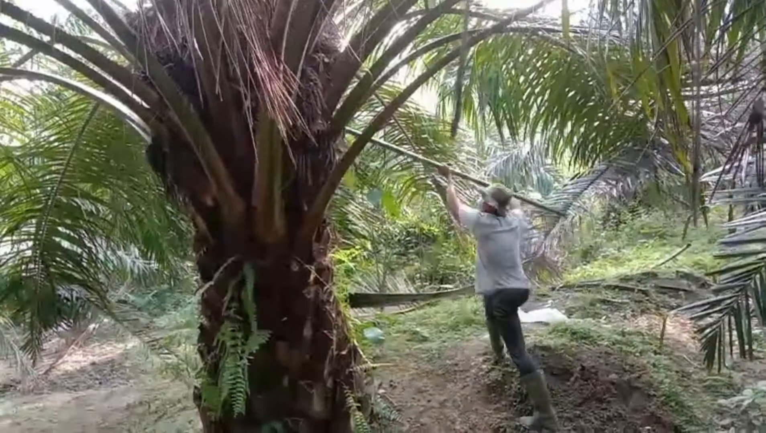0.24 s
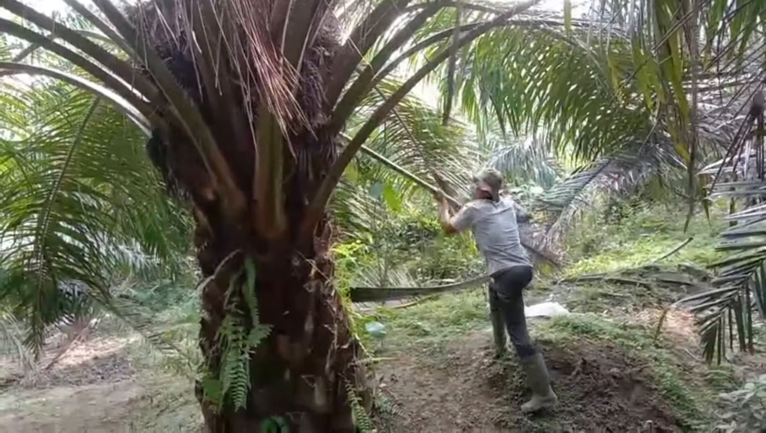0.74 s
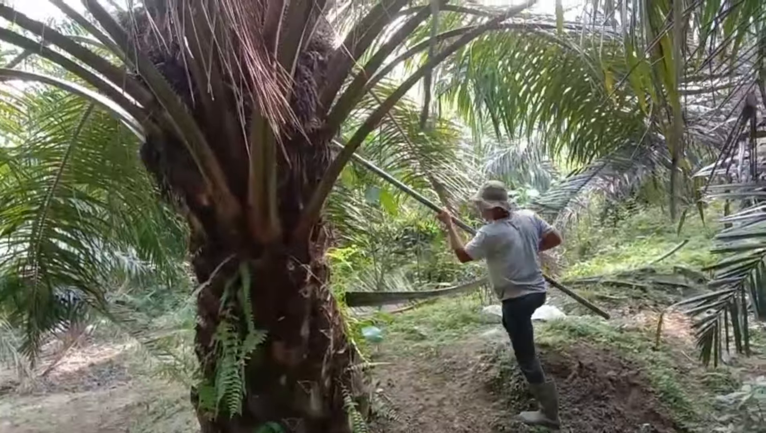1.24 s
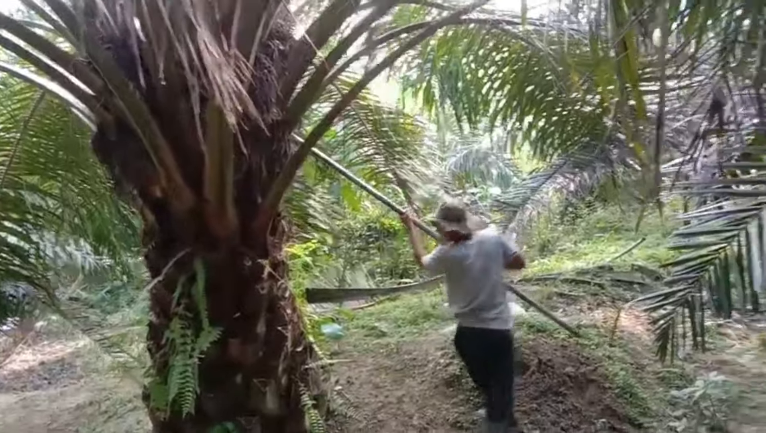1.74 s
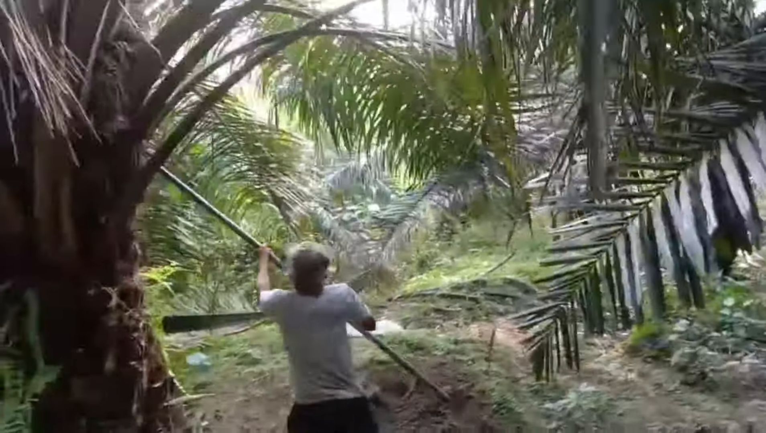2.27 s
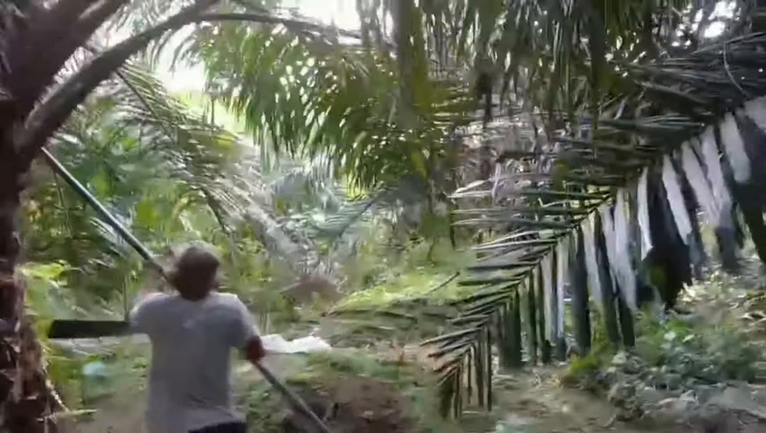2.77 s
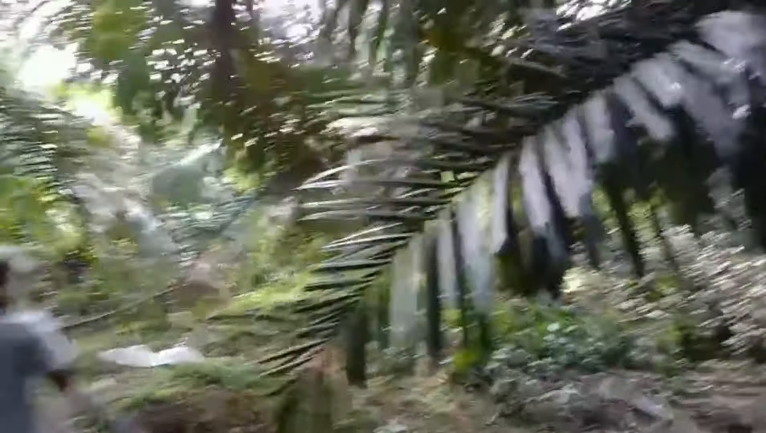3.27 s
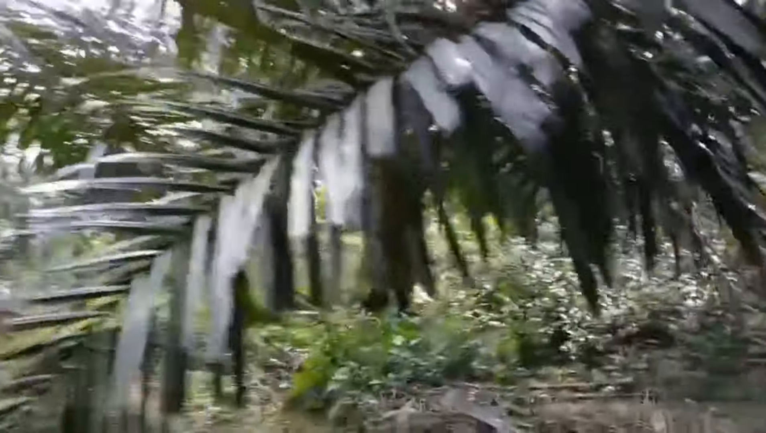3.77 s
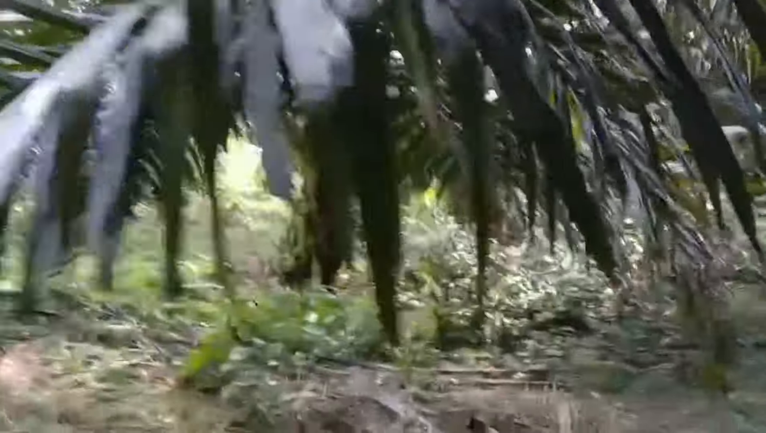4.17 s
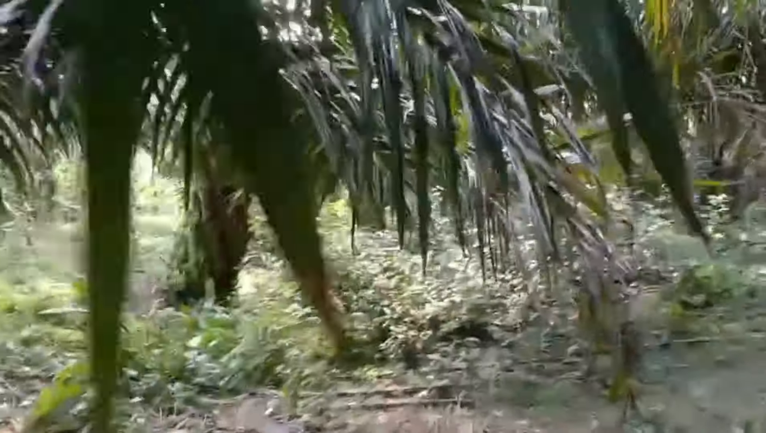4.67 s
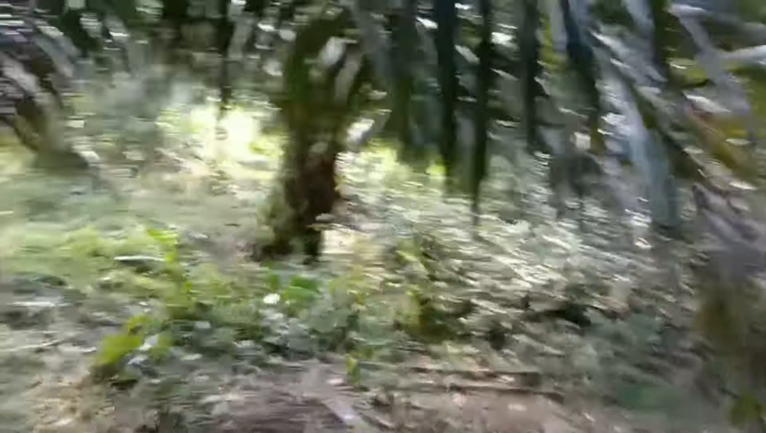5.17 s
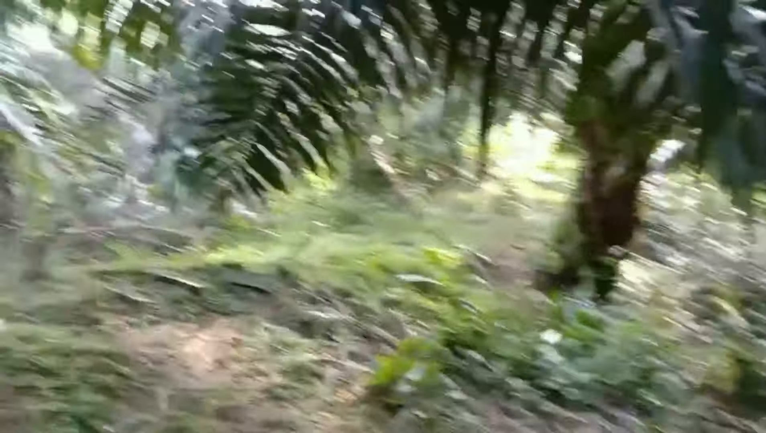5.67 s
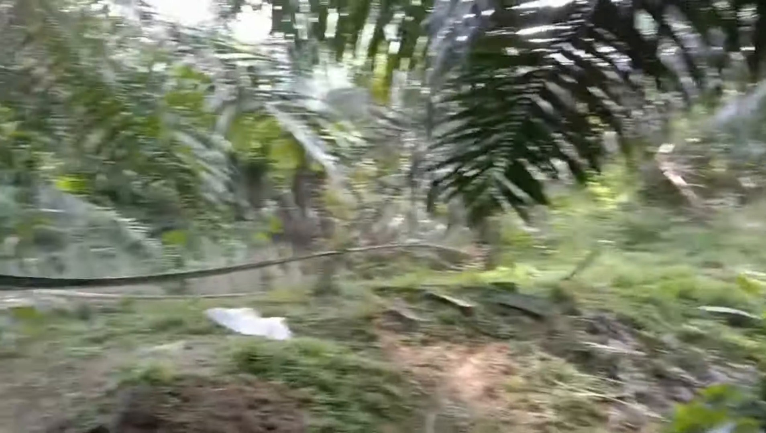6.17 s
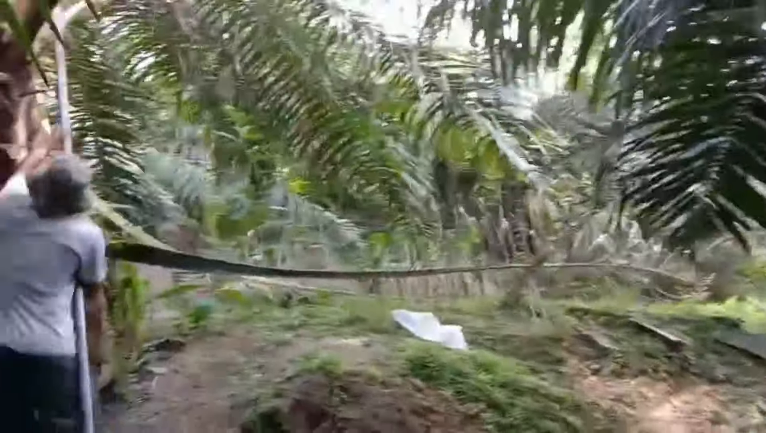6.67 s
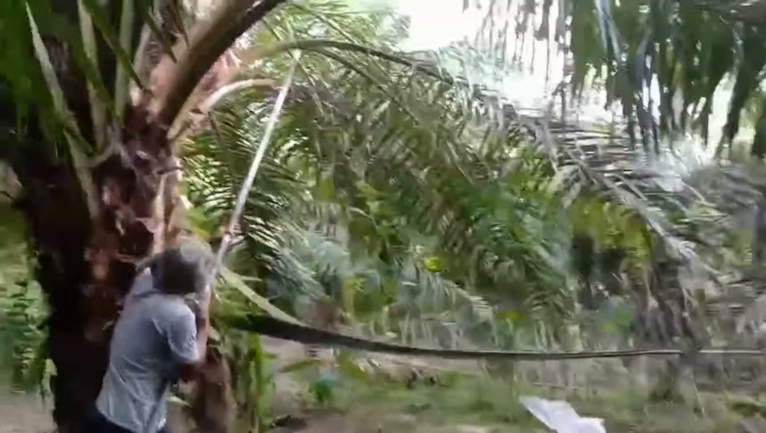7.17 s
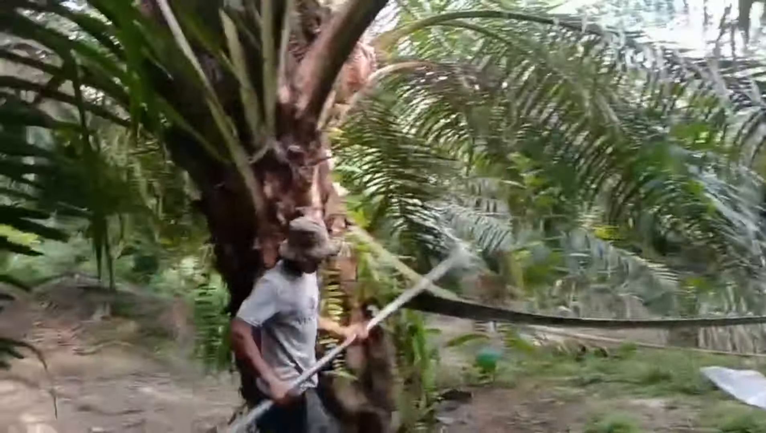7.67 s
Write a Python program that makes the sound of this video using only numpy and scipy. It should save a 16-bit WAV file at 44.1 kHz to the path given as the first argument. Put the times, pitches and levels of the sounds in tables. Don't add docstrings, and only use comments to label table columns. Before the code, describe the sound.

Outdoor plantation, phone microphone nearby: the pole sticks and slips softly on a stalk, then brittle fibres snap with showers of leaflet clicks. Steel briefly rings, stalks thud and dry leaves swish. Leaflets tick through a busy middle; later, hard pole clanks and dense crunching lead to a big rustling crash. Pauses are almost silent, with only short dull echoes.

```python
import sys
import numpy as np
from scipy import signal
from scipy.io import wavfile
from scipy.ndimage import uniform_filter1d

SR = 44100
rng = np.random.default_rng(int(sys.argv[2]) if len(sys.argv) > 2 else 0)


def store_pcm(level_fs):
    pcm = np.round(np.clip(level_fs, -1, 1) * 32767).astype(np.int16)
    wavfile.write(sys.argv[1], SR, np.atleast_2d(pcm).T)


def linear_from_db(decibels):
    return 10 ** (np.asarray(decibels, float) / 20)


N = 349713

# start in seconds, leaflet hiss in dB, fall in seconds, ribs in dB against the hiss.
JOLTS = [(0.308, -50.5, 0.06, 6), (.37, -63, 0.35, 18), (1.066, -39, 0.17, -4), (1.767, -44.5, 1, -6.5),
         (2.67, -32.5, 0.22, 4.5), (3.33, -39, 0.44, -4), (4.452, -33, 0.29, -3.5), (5.801, -25.5, 0.17, 0),
         (6.599, -39.5, 1, -1.5), (7.067, -27, 0.29, -8), (7.127, -21, 0.082, 3),
         (7.295, -33.5, 0.36, -3.5), (7.827, -21.5, 1, -20)]
JOLT_RISE_S = 0.022
# time of the top in seconds, leaflet hiss in dB, rise in seconds,
# fall in seconds, ribs in dB against the hiss.
SWAYS = [(.07, -48, 0.42, 0.14, 11), (.2, -57.5, 0.43, 0.31, -10), (.43, -50.5, 0.11, 0.45, 19),
         (.52, -41, .06, 0.09, 0), (.64, -37, 0.39, 0.14, 2.5), (.76, -47.5, 0.13, 0.1, -19),
         (1.22, -66, .05, .08, 6), (1.58, -75, .04, .2, 12), (2.1, -30.5, 0.092, 0.15, -9),
         (2.56, -30.5, 0.052, 0.13, -37.5), (2.72, -40, 0.44, 0.38, -5), (3.27, -62.5, 2, .2, -26),
         (3.5, -40, 0.26, 0.095, -4), (3.69, -39.5, 0.11, 0.43, -6), (3.86, -40, 0.059, 0.11, 15),
         (3.99, -34, 0.44, 0.28, -3.5), (4.04, -25, .04, 0.071, 0), (4.097, -21, 0.061, 0.087, -4),
         (4.35, -41.5, 0.5, 0.51, -3), (4.84, -40.5, 0.27, 0.38, -3), (5.25, -42, 1, 0.38, -10),
         (5.43, -39, 0.63, 0.14, -1.5), (5.51, -34, .05, 0.13, -2), (5.57, -38.5, 0.2, 0.078, -6),
         (5.72, -55, 0.61, 0.5, -9), (6.16, -44, 0.54, 0.063, -10), (6.42, -63, 0.51, 0.085, 3.5),
         (6.75, -36.5, 0.18, 0.046, -5), (6.845, -33.5, 0.29, 0.2, -6.5), (7.333, -24, .04, .05, -10),
         (7.55, -47.5, 0.65, 0.98, -24), (7.9, -17, 0.12, .5, -10)]
# time of the top in seconds, rumble in dB, rise and fall in seconds.
LOADS = [(.0, -35.5, .1, 0.1), (.42, -63, 0.037, 0.21), (.64, -42, 0.16, 0.11), (.75, -49.5, 0.038, 0.054),
         (1.06, -50, 0.03, 0.043), (1.21, -62, .05, .06), (1.77, -58.5, 0.084, 0.21),
         (2.1, -56, 0.14, 0.079), (2.56, -57.5, 0.21, 0.28), (2.67, -25, 0.026, 0.018),
         (2.72, -50.5, 0.061, 0.12), (3.51, -38.5, 0.038, 0.011), (3.6, -43, 0.005, 0.059),
         (3.86, -48.5, 0.036, 0.29), (4.04, -36.5, 0.17, 0.1), (4.46, -54, 0.18, 0.16),
         (4.84, -65.5, 0.26, 0.13), (5.32, -70.5, 0.52, 0.088), (6.16, -63.5, 0.66, 0.053),
         (6.82, -42, 0.26, 0.077), (7.07, -52, 0.057, 0.14), (7.13, -35.5, 0.21, 0.12),
         (7.4, -60.5, 0.31, 0.31), (7.82, -35.5, 0.0091, 0.17)]
SWELL_DB = 30
SETTLE = 1.285
# time in seconds, dry edge in dB against the hiss.
DRYNESS = [(0, -21), (.45, -19.5), (.65, -7), (1.1, -19.5), (2.1, -21), (2.3, -9), (3.4, -13), (4.5, -16),
           (5.42, -13), (5.55, -26), (5.75, -34), (5.82, -16), (6.2, -6.5), (6.8, -14), (7.4, -5),
           (7.93, -7)]
# stalk, ribs, leaflets and edges, in dB.
RESTING_DB = (-100, -78, -75, -79.5)
# start in seconds, peak in dB, ribs in dB, shower of clicks in dB.
SNAPS = [(2.079, -11, -4, -17.5), (2.294, -25.5, -12.5, -14.5), (2.415, -21, -20, -11),
         (2.48, -15, -7, -16.5), (2.542, -11, -7, -17.5), (3.302, -13, -0.5, -19),
         (3.513, -23.5, -9.5, -15.5), (3.601, -11, -3, -17.5), (3.738, -23.5, -19, -13),
         (4.681, -23.5, -15, -15), (5.026, -34.5, -11.5, -4), (5.173, -12, -2, -33), (5.4, -18, -26, -28),
         (5.427, -16, -2.5, -18), (5.796, -21, 11.5, -15), (6.119, -29.5, -11, -7),
         (6.135, -6.5, -14.5, -19.5), (6.411, -29, -30, -13.5), (6.446, -33, -43, -13.5),
         (7.062, -25, 13.5, -17.5), (7.125, -9, -17, -13), (7.286, -11, -9, -18), (7.325, -20, -12, -15),
         (7.619, -34.5, -7, -16), (7.814, -8, 6, -13.5)]
# start in seconds, peak in dB, ribs in dB, shower of clicks in dB.
CRACKS = [(1.05, -24, -1.5, -16.5), (1.645, -51.5, -3, -12), (1.721, -43.5, -25, 4.5), (2.663, -2, -7, -22),
          (2.839, -22.5, -6, -12), (3.405, -22, -2, -17), (3.807, -36, 26.5, -20), (3.829, -27.5, 9.5, -9),
          (3.871, -32, 27, -31), (3.904, -28, 15, -19), (4.028, -22, -8, -12), (4.771, -46, 19, -13),
          (4.817, -34, 14.5, -20), (5.305, -13.5, -35, -35), (5.445, -13, -4.5, -24),
          (5.49, -20.5, -16, -17), (6.005, -28, 0.5, -7.5), (6.022, -20, 1, -17.5),
          (6.165, -11.5, -6, -26.5), (6.32, -42, -1, -21), (6.379, -31, 4, -22), (6.582, -33, 8.5, -15),
          (7.417, -19.5, -19, -10), (7.811, -15, 2, -8)]
SNAP_EDGE_DB, CRACK_EDGE_DB = -14, -27
SHOWER_T60_S, SHOWER_LONGER = 0.15, 0.77
# pitch in Hz, level in dB per Hz.
FROND_COLOUR = [(59, -34), (100, -18.5), (287, -13.5), (402, -12), (695, -7.5), (1130, -11.5), (2410, -8),
                (2850, -3.5), (4170, -4.5), (5150, 6), (9480, -12.5), (15400, -19)]
# stalk, ribs, leaflets and edges, in Hz.
ZONES_HZ = (250, 1200, 4500, 11000)
# time in seconds, hollow tone in dB.
THICKNESS = [(0, -7.5), (.5, 1), (.9, -8), (1.5, -3), (1.6, 8), (1.75, -3), (2.4, -5), (3, -3), (3.5, -1.5),
             (3.9, -2.5), (4.4, 1), (5.2, -1), (5.6, -17), (5.9, -5), (6.3, -7.5), (6.8, 3), (7.3, -1),
             (7.93, -5.5)]
HOLLOW_HZ, HOLLOW_OCTAVES = 830, 0.47
# start in seconds, peak in dB, centre pitch in Hz.
TICKS = [(0.5125, -29, 1370), (0.61, -30, 5790), (0.6346, -28, 6010), (3.4278, -25.5, 1284),
         (3.4466, -29, 5200), (3.855, -20, 1230), (3.9855, -27, 5390), (4.012, -15, 2800),
         (4.0432, -19, 5050), (4.6836, -28.5, 5730), (4.6934, -31, 5050), (5.0434, -42, 5800),
         (5.1038, -32, 5000), (5.1174, -33, 6510), (5.1739, -17, 1740), (5.2255, -31, 6410),
         (5.4106, -20, 5110), (5.4292, -17.5, 5080), (5.445, -24, 4890), (5.531, -39, 5900),
         (5.5558, -29, 2850), (6.0644, -25, 6840), (6.0906, -30, 3330), (6.136, -7.5, 2870),
         (6.1689, -24, 1340), (6.486, -40, 5210), (6.7163, -23, 1200), (6.7416, -24, 2940),
         (6.7524, -22.5, 3140), (6.84, -24, 5120), (7.2816, -10, 5580), (7.2984, -20, 5810),
         (7.3314, -16, 5290), (7.461, -26, 5910), (7.4956, -28, 5360), (7.5546, -31, 5090),
         (7.7847, -36.5, 1650), (7.8792, -7, 1200), (7.897, -2, 6060)]
TICK_T60_S, TICK_OCTAVES, TICK_DB = 0.012, 0.66, -5

# level in dB, time to die by 60 dB in seconds.
BLADE_MODES = [(-18, 0.95), (2, .42), (-0.5, 0.17), (-3.5, 0.16), (-14, .17), (-15, .12)]
BLADE_HZ = (2830, 2852, 2884, 3144, 8113, 8204)
# start in seconds, main ring in dB, edge ring in dB, top ring in dB.
BLADE_HITS = [(2.08, -28, -40, -22), (2.255, -53, -57, -60), (2.295, -47, -50, -32), (2.481, -42, -42, -29),
              (2.542, -40, -33, -26), (2.582, -40, -42, -50), (2.663, -44, -36, -37),
              (3.302, -31, -28, -25), (3.603, -39, -40, -24), (4.031, -34, -31, -60), (4.09, -45, -40, -62),
              (5.8, -46, -44, -64), (7.061, -40, -32, -50), (7.13, -38, -45, -50), (7.831, -26, -20, -26)]
# time to die by 60 dB in seconds, level in dB when struck
# on the side, level in dB near the grip, level in dB at the end.
POLE_MODES = [(1.2, -47, -46, -76), (0.12, -20, -11.5, -34), (0.23, -16, -28, -17), (0.1, -32, -38, -25),
              (0.29, -32, -36, -22.5), (0.14, -40, -45, -13.5), (0.25, -32, -25, -45),
              (0.24, -25, -20.5, -40), (0.15, -34, -35, -36), (0.12, -40, -23.5, -22), (0.2, -48, -51, -31),
              (0.11, -21, -31, -35), (0.49, -33.5, -30.5, -39), (0.45, -43, -37, -48)]
POLE_HZ = (706, 930, 1104, 1296, 1524, 1673, 1762, 1836, 2081, 2597, 3047, 3165, 3693, 3962)
# start in seconds, contact in seconds, side force in dB,
# grip force in dB, end force in dB.
POLE_BLOWS = [
    (4.029, 0.0065, -11.5, -39, -12),
    (4.09, 0.0032, -30, -20.5, -26),
    (6.83, 0.0029, -22.5, -21.5, -35),
    (7.057, .005, 1, -20, -30),
    (7.124, .006, -14.5, -2, -25),
    (7.148, .008, -12, -2, -25),
    (7.812, 0.0034, -27, -20, -3),
    (7.87, .0056, -20, -30, -6),
]
WAVER = 0.06

# start in seconds, peak in dB.
SLIPS = [(0.002, -40), (.022, -40.5), (0.042, -36), (0.062, -33), (0.083, -31.5), (0.232, -56),
         (0.296, -45), (.31, -50), (0.511, -29), (0.586, -29), (0.608, -26.5), (0.632, -26.5), (0.662, -28),
         (0.739, -41)]
SLIP_HZ, SLIP_SPREAD, SLIP_T60_S = 255, 0.03, 0.05
SLIP_OVERTONE_HZ, SLIP_OVERTONE_DB = 790, -4
# start in seconds, end in seconds, slips per second,
# peak in dB, pitch in Hz.
CHATTER = (0.385, .56, 62, -40, 255)
# start in seconds, peak in dB, pitch in Hz.
THUMPS = [(1.21, -62.5, 400), (1.57, -66, 546), (2.086, -37, 272), (2.548, -40, 307), (2.663, -24, 271),
          (3.497, -33.5, 169), (3.806, -28, 700), (4.04, -43, 116), (4.113, -28, 164), (4.334, -28.5, 585),
          (4.445, -24.5, 520), (4.817, -32, 510), (5.257, -31.5, 555), (5.802, -35, 387),
          (5.873, -42.5, 266), (5.919, -42.5, 240), (6.803, -43, 439), (6.886, -44, 230),
          (7.069, -21.5, 264), (7.129, -23.5, 262), (7.816, -20.5, 370)]
# start in seconds, peak in dB, pitch in Hz, time to die by 60 dB in seconds.
POPS = [(5.173, -21.5, 1590, 0.0086), (5.398, -22, 5230, .012), (5.41, -24, 5100, .012),
        (7.816, -2.5, 1484, 0.015), (5.808, -25, 1450, .05), (6, -31, 1230, .03), (7.621, -45, 1500, 0.022),
        (3.3, -40, 1270, 0.019), (.665, -50, 930, .12), (.66, -54, 1680, .2), (2.482, -34, 900, .03),
        (3.304, -32, 3150, .08), (4.455, -38, 1250, .04), (4.535, -36, 1500, .03), (4.33, -44, 1200, .03),
        (5.35, -44, 1080, .06), (6.832, -34, 970, .08), (7.3, -30, 1600, .03)]

# delay in seconds, level in dB.
ECHOES = [
    (0.01, -15.5),
    (0.025, -22.5),
    (0.039, -45),
]
# time in seconds, pitch in Hz, level in dB.
INSECT = [
    (4.19, 13738, -97),
    (4.194, 13600, -90),
    (4.3, 13000, -72),
    (4.385, 13736, -75),
    (4.45, 13000, -70),
]
# pitch in Hz, level in dB per Hz.
GROVE = [(35, -26), (60, -3), (560, 5.5), (871, -12.5), (1070, -61.5), (1630, 30.5), (2260, -78),
         (3210, 7.5), (4240, -9), (5230, -3.5), (15600, 18)]
GROVE_DB = -75
# time of the top in seconds, level in dB, rise and fall in seconds.
BUMPS = [
    (0, -79, .3, 0.35),
    (.62, -75, 0.45, .3),
    (2.69, -66.5, 0.57, .4),
    (3.51, -63, 0.35, 0.46),
    (4.05, -37.5, 0.033, 0.13),
    (5.28, -48, 0.07, 0.07),
    (5.34, -70.5, 2.8, 0.91),
    (6.15, -71, 0.13, 0.2),
    (7.2, -69, 1.6, 0.77),
    (7.93, -38, 0.14, .2),
]
HAND_DB = -89.5
# pitch in Hz, width in Hz, change in dB.
MIC_DIPS = [(600, 200, -11), (2300, 300, -2), (4200, 500, -7), (7400, 350, -9)]
TOP_BAND_HZ, CUTOFF_HZ = 10700, 15650


def fronds():
    power = shaking() * linear_from_db(-14.5)
    source = crackle(1500, 3.65, hiss=0.6) + linear_from_db(-13.0) * pings(500, cycles=71.0)
    breaks = [(*row, SNAP_EDGE_DB) for row in SNAPS] + [(*row, CRACK_EDGE_DB) for row in CRACKS]
    for s, peak_db, ribs_db, shower_db, edge_db in breaks:
        t60 = SHOWER_T60_S * linear_from_db(SHOWER_LONGER * (shower_db + 17.5))
        i = round(s * SR)
        t = np.arange(min(SR // 2, N - i)) / SR
        crack = linear_from_db(-120 * t / 0.0078)
        shower = linear_from_db(shower_db - 120 * t / max(t60, 0.01)) * (1 - np.exp(-t / 0.0022))
        zones_db = peak_db - 9.0 + np.array([ribs_db - 32.0, ribs_db, -1.5, edge_db])
        power[:, i:i + len(t)] += linear_from_db(2 * zones_db)[:, None] * (crack + shower)
        source[i + 20] += 4.0
    hollow_db = in_time(THICKNESS)[0]
    rustle = colour(source, FROND_COLOUR, 10 * np.log10(power), patchy_db=3.0, hollow_db=hollow_db)
    return dip(rustle, 241, 46, 11.6)


def shaking():
    jolts = [(s, db, JOLT_RISE_S, fall, ribs_db) for s, db, fall, ribs_db in JOLTS]
    moves = SWAYS + jolts
    each = swells(moves)
    ribs_db = np.array(moves)[:, -1]
    stalk = smooth_out(swells(LOADS).sum(axis=0))
    ribs = smooth_out(linear_from_db(2 * ribs_db) @ each)
    leaflets = smooth_out(each.sum(axis=0))
    edges = leaflets * linear_from_db(2 * in_time(DRYNESS)[0])
    return np.array([stalk, ribs, leaflets, edges]) + linear_from_db(2 * np.array(RESTING_DB))[:, None]


def crackle(per_s, spread_db, hiss):
    sizes = linear_from_db(spread_db * np.minimum(rng.exponential(1, N), 3.3)) * rng.choice([-1, 1], N)
    born = rng.random(N) < per_s * linear_from_db(3 * drift(40)) / SR
    hiss = np.clip(hiss, 0, 1)
    return np.sqrt(1 - hiss) * rms_one(sizes * born) + np.sqrt(hiss) * rng.standard_normal(N)


def pings(per_s, cycles):
    sizes = linear_from_db(3.5 * np.minimum(rng.exponential(1, N), 3)) * (rng.random(N) < per_s / SR)
    dealt = rng.integers(0, 24, N)
    pitches = np.geomspace(300, 7000, 24) * rng.uniform(1.0, 1.05, 24)
    out = np.zeros(N)
    for k, hz in enumerate(pitches):
        out += ring(sizes * (dealt == k), hz, cycles / hz) * np.sqrt(hz)
    return rms_one(out)


def ticks():
    t = np.arange(2048) / SR
    out = np.zeros(N + len(t))
    for s, db, hz in TICKS:
        fizz = rng.standard_normal(len(t)) * linear_from_db(-60 * t / TICK_T60_S)
        edges = np.clip(hz * 2 ** (TICK_OCTAVES * np.array([-0.5, 0.5])), 100, SR / 2.2)
        tick = signal.sosfilt(signal.butter(1, edges, "band", fs=SR, output="sos"), fizz)
        i = round(s * SR)
        out[i:i + len(t)] += linear_from_db(db + TICK_DB) * tick / np.abs(tick).max()
    return out[:N]


def blade():
    out, shaken_db = np.zeros(N), 2.0 * drift(35)
    for s, main_db, edge_db, top_db in BLADE_HITS:
        for hz, (db, t60) in zip(BLADE_HZ, BLADE_MODES):
            hit_db = main_db if hz < 2870 else edge_db if hz < 5000 else top_db
            add(out, s, db + hit_db, hz, t60, 0.002, shaken_db)
    return out


def pole():
    out = np.zeros(N)
    for hz, (t60, *place_db) in zip(POLE_HZ, POLE_MODES):
        rubbed_db = 3 * drift(25)
        for s, contact, *force_db in POLE_BLOWS:
            loudest_db = max(np.add(place_db, force_db))
            add(out, s, loudest_db, hz, t60, contact, rubbed_db)
    return out


def slips():
    out, smooth = np.zeros(N), np.zeros(N)
    for s, peak_db in SLIPS:
        hz = SLIP_HZ * (1 + SLIP_SPREAD * rng.standard_normal())
        add(out, s, peak_db + 4.0, hz, SLIP_T60_S, 0.0015, smooth)
        add(out, s, peak_db + SLIP_OVERTONE_DB, SLIP_OVERTONE_HZ, 0.03, 0.0015, smooth)
    return out


def chatter():
    start, end, per_s, peak_db, hz = CHATTER
    clicks = np.zeros(N)
    clicks[round(start * SR):round(end * SR):round(SR / per_s)] = linear_from_db(peak_db)
    rung = ring(clicks * linear_from_db(2 * drift(30)), hz, 0.065)
    return signal.sosfilt(signal.butter(2, hz / 2, "high", fs=SR, output="sos"), rung)


def thumps():
    out, smooth = np.zeros(N), np.zeros(N)
    for s, peak_db, hz in THUMPS:
        add(out, s, peak_db + 8.0, hz, 10.2 / hz, 0.003, smooth)
    return out


def pops():
    out, smooth = np.zeros(N), np.zeros(N)
    for s, peak_db, hz, t60 in POPS:
        add(out, s, peak_db + 6.5, hz, t60, 0.001, smooth)
    return out


def echoes(x):
    dull = signal.lfilter([0.55], [1, -0.45], x)
    return sum(linear_from_db(db) * np.pad(dull, (round(s * SR), 0))[:N] for s, db in ECHOES)


def insect():
    hz, db = in_time(INSECT)
    t = np.arange(N) / SR
    on = np.clip(np.minimum(t - INSECT[0][0], INSECT[-1][0] - t) / 0.015, 0, 1)
    return on * linear_from_db(db + 8) * np.sin(2 * np.pi * np.cumsum(hz) / SR)


def grove():
    zones_db = np.zeros((4, 1)) + [[-12], [-6], [0], [-18]]
    air = colour(rng.standard_normal(N), GROVE, zones_db, patchy_db=5.5)
    far = signal.sosfilt(signal.cheby2(8, 30, 10800, fs=SR, output="sos"), air)
    return linear_from_db(GROVE_DB) * rms_one(far)


def handling():
    band = signal.butter(2, [50, 140], "band", fs=SR, output="sos")
    lumps = rms_one(signal.sosfilt(band, rng.standard_normal(N)))
    level = np.sqrt(smooth_out(swells(BUMPS).sum(axis=0)) + linear_from_db(2 * HAND_DB))
    return level * linear_from_db(3 * drift(8) + 2 * drift(40) - 3) * lumps


def rms_one(x):
    return x / np.sqrt(np.mean(x ** 2) + 1e-20)


def in_time(rows):
    s, *columns = np.transpose(rows)
    return np.array([np.interp(np.arange(N) / SR, s, c) for c in columns])


def at_hz(points, hz):
    table_hz, db = np.transpose(points)
    return np.interp(np.log(hz), np.log(table_hz), db)


def drift(rate):
    r = np.exp(-80 * np.pi * rate / SR)
    slow = signal.lfilter([1], [1, -2 * r, r * r], rng.standard_normal(N // 40 + 2002))[2000:]
    return np.interp(np.arange(N) / 40, np.arange(len(slow)), rms_one(slow))


def swells(rows):
    s, db, rise, fall = np.transpose(rows)[:4, :, None]
    late = np.arange(0, N + 32, 32) / SR - s
    before = -late / np.maximum(rise, 0.005)
    after = np.abs(late / np.maximum(fall, 0.005)) ** SETTLE
    return linear_from_db(2 * (db - SWELL_DB * np.where(late < 0, before, after)))


def smooth_out(power):
    return np.interp(np.arange(N) / 32, np.arange(len(power)), power)


def ring(clicks, hz, t60):
    r, w = linear_from_db(-60 / (max(t60, 0.005) * SR)), 2 * np.pi * hz / SR
    return signal.lfilter([0, np.sin(w)], [1, -2 * r * np.cos(w), r * r], clicks + 1e-18)


def add(out, s, db, hz, t60, rise, rough_db):
    i = round(s * SR)
    t = np.arange(min(round(max(t60, 0.01) * SR), N - i)) / SR
    rough = rough_db[i:i + len(t)]
    swell = (1 - np.exp(-t / rise)) * linear_from_db(db - 60 * t / max(t60, 0.01) + rough)
    out[i:i + len(t)] += swell * np.sin(2 * np.pi * hz * t + WAVER * rough)


def colour(source, spectrum, zones_db, patchy_db, hollow_db=0):
    power, edges = np.zeros(len(ZONES_HZ)), 100 * 2 ** (np.arange(31) / 4)
    bands = []
    for low, high in zip(edges, edges[1:]):
        hz = np.sqrt(low * high)
        place = np.interp(np.log(hz), np.log(ZONES_HZ), np.arange(len(ZONES_HZ)))
        power[round(place)] += linear_from_db(2 * at_hz(spectrum, hz)) * (high - low) * 2 / SR
        bands.append((low, high, hz, min(int(place), 2), place))
    zones_db = zones_db - 10 * np.log10(power)[:, None]
    out = 0
    for k, (low, high, hz, z, place) in enumerate(bands):
        level_db = zones_db[z] + (place - z) * (zones_db[z + 1] - zones_db[z])
        level_db = level_db + hollow_db * np.exp(-(np.log2(hz / HOLLOW_HZ) / HOLLOW_OCTAVES) ** 2)
        level_db = level_db + at_hz(spectrum, hz) + patchy_db * drift(10.4)
        gain = linear_from_db(level_db) * (-1) ** k
        band = signal.butter(2, [low, high], "band", fs=SR, output="sos")
        out = out + signal.sosfilt(band, gain * source)
    return out


def dip(x, hz, width_hz, db):
    w, a = 2 * np.pi * hz / SR, linear_from_db(db / 2)
    alpha = np.sin(w) * width_hz / hz / 2
    above = [1 + alpha * a, -2 * np.cos(w), 1 - alpha * a]
    below = [1 + alpha / a, -2 * np.cos(w), 1 - alpha / a]
    return signal.lfilter(above, below, x)


def scene():
    work = fronds() + ticks() + blade() + pole() + slips() + chatter() + thumps() + pops()
    return (work + echoes(work) + insect() + grove() + handling())[None]


def suppress(x, streak_db, quiet_db, top_gate_db):
    hz, _, spec = signal.stft(x, SR, nperseg=512, noverlap=384)
    power = uniform_filter1d(np.abs(spec) ** 2, size=5, axis=-1)
    wander = signal.lfilter([1], [1, -0.93], rng.standard_normal(spec.shape), axis=-1)
    wander = rms_one(uniform_filter1d(wander, size=2, axis=-2))
    pause = 1 / (1 + power.sum(axis=-2, keepdims=True) / linear_from_db(2 * quiet_db))
    top = power[:, hz > TOP_BAND_HZ].sum(axis=-2, keepdims=True)
    shut = np.where(hz[:, None] > TOP_BAND_HZ, top / (top + linear_from_db(2 * top_gate_db)), 1)
    gain = shut * linear_from_db(streak_db * (1.02 + pause) * wander)
    return signal.istft(gain * spec, nperseg=512, noverlap=384)[1][:, :N]


def band_limit(x):
    return signal.sosfilt(signal.butter(12, 16690, fs=SR, output="sos"), x)


def record(dry):
    x = dry
    for hz, width_hz, db in MIC_DIPS:
        x = dip(x, hz, width_hz, db)
    x = suppress(x, streak_db=2.5, quiet_db=-63.5, top_gate_db=-86)
    x = 0.79 * np.tanh(x / 0.99)
    x = signal.sosfilt(signal.butter(2, 60, "high", fs=SR, output="sos"), x)
    x = signal.sosfilt(signal.cheby2(20, 40, CUTOFF_HZ, fs=SR, output="sos"), x)
    return band_limit(x)


dry = scene()
out = record(dry)
store_pcm(out)
```